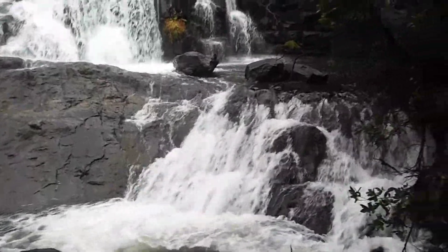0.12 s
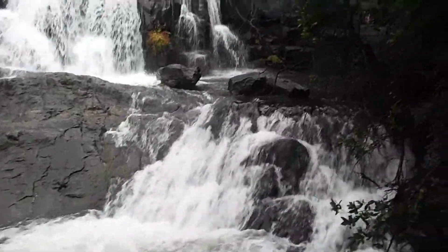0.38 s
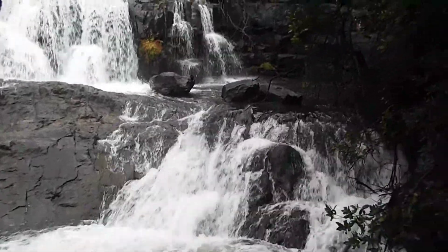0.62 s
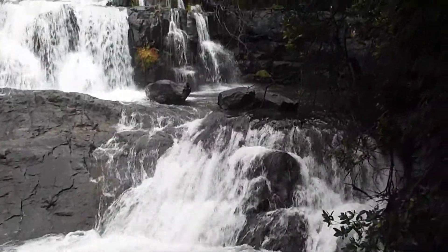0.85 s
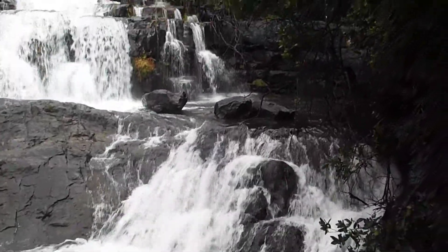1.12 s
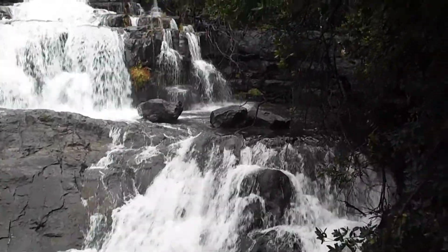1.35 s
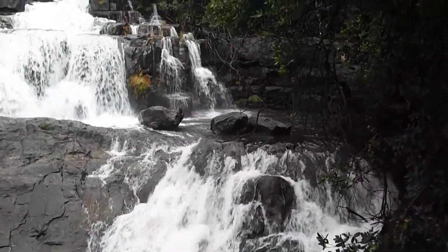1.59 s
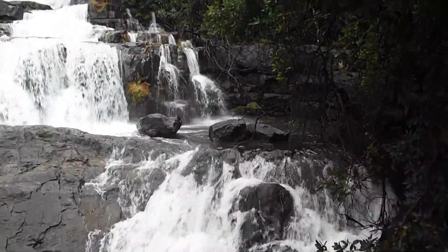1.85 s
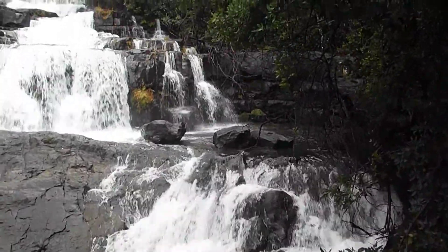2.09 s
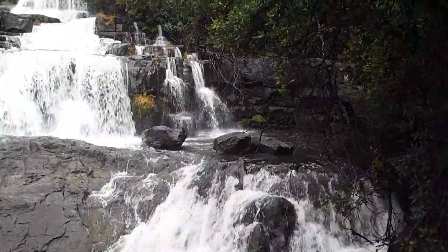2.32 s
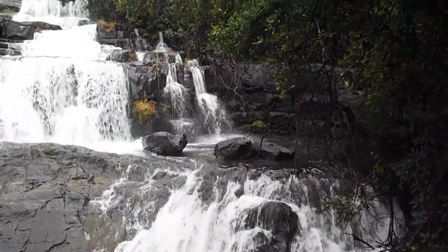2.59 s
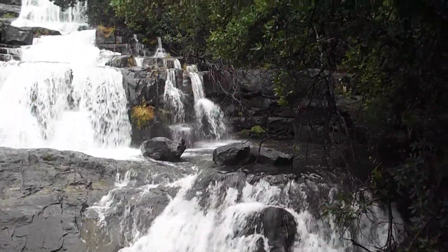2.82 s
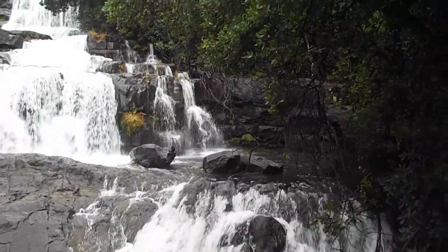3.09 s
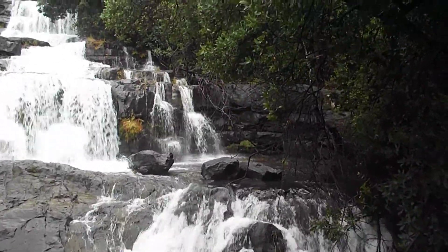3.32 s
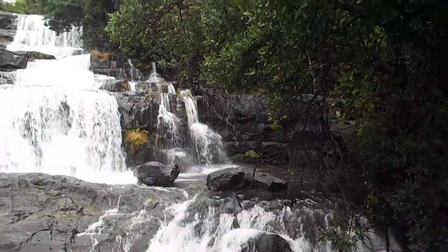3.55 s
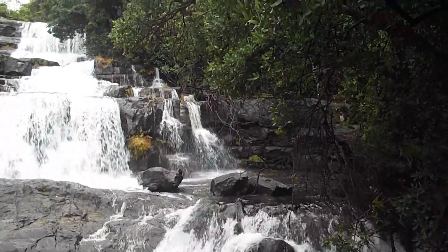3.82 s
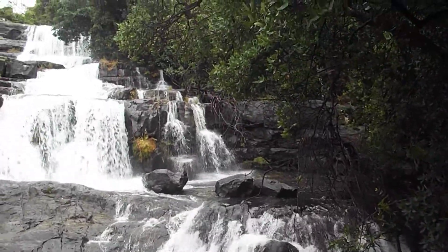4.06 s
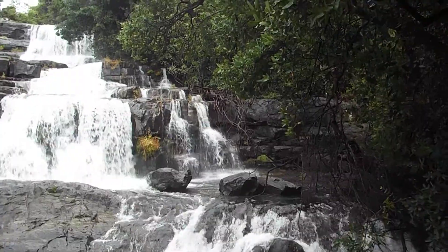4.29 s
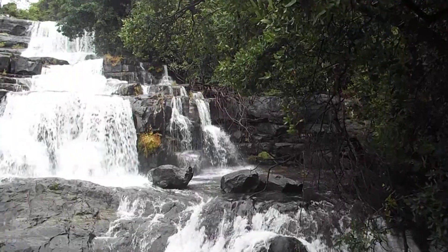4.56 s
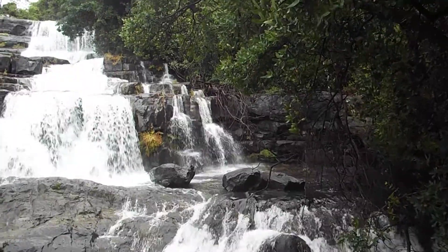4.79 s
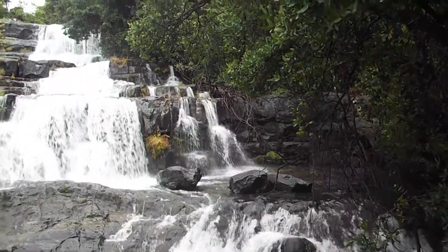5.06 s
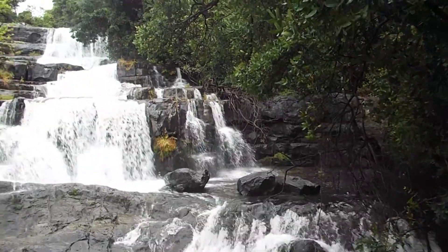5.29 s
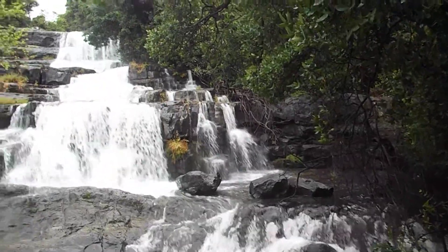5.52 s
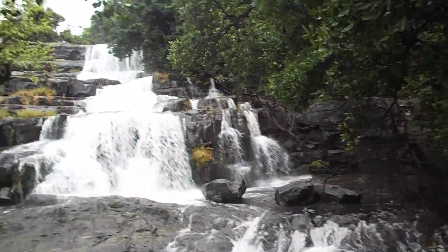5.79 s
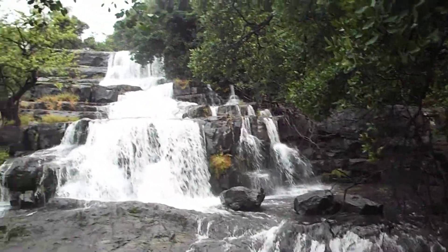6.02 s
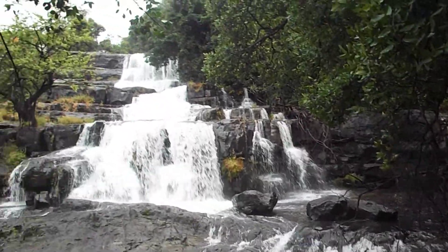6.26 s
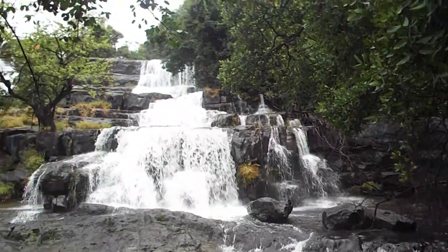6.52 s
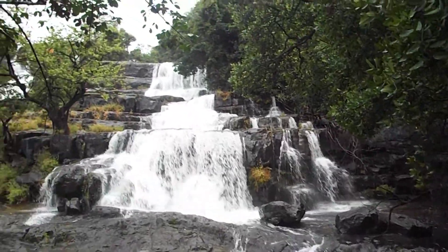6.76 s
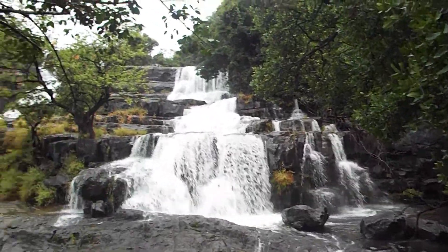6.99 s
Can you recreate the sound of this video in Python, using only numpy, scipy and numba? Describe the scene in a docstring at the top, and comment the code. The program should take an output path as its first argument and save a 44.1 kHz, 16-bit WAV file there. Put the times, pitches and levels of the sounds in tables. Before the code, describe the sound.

Constant loud white-water noise from start to end, without build-up or fade. The falling water is a thick hiss with slight drifting patches and faint tiny bubble sounds underneath. Heard close through a small camera microphone outdoors: bass cut, piercing upper range, dull at the very top, stronger in the left channel. Very brief crests set off sudden level dips that refill within hundredths of a second.

```python
"""In a forest, a waterfall pours over rock steps, close to a small stereo camera microphone.
Dense random noise in drifting patches, with short gliding bubble rings under it, makes one steady rush.
A cavity before the capsules gives it a bright peak; the left channel is louder.
Many times a second the whole level drops at once and climbs back within a few hundredths of a second:
at listed instants, each under a brief crest, and wherever gain control answers a crest of the rush."""
import sys
import numpy as np
from scipy import signal
from scipy.fft import rfft, irfft
from scipy.io import wavfile
from scipy.ndimage import uniform_filter1d, minimum_filter1d
from numba import njit

SR = 44100
rng = np.random.default_rng(int(sys.argv[2]) if len(sys.argv) > 2 else 0)


def natural_amplitude(level_db):
    """Convert a level in decibels to a linear amplitude factor, elementwise."""
    exponent = np.asarray(level_db, float) / 20
    return 10 ** exponent


def to_wav(sig):
    """Store sig (one row per channel, or 1-D mono) as 16-bit WAV at the path in sys.argv[1].

    Samples outside -1..1 are clipped; the rate is SR.
    """
    pcm = np.clip(np.atleast_2d(sig), -1, 1) * 32767
    pcm = np.round(pcm).astype(np.int16)
    wavfile.write(sys.argv[1], SR, pcm.T)  # frames by channels


N = 314433  # samples, about 7.1 s


def evened(x):
    """Scales to rms 1."""
    return x / np.sqrt(np.mean(x ** 2) + 1e-20)


def read(points, hz):
    """Reads a table on a log-frequency axis."""
    f, value = np.transpose(points)
    return np.interp(np.log(hz + 1), np.log(f + 1), value)


def churn(patchy_db):
    """White random spectra with drifting patches where sheets of water thicken and thin."""
    frames = N // 128 + 5
    real, imaginary, patches = rng.standard_normal((frames, 257, 3)).T
    # patches about 700 Hz wide and 60 ms long
    patches = uniform_filter1d(patches, size=8, axis=0)
    patches = evened(uniform_filter1d(patches, size=20, axis=1))
    spectra = (real + 1j * imaginary) * natural_amplitude(patchy_db * patches)
    return evened(signal.istft(spectra, nperseg=512, noverlap=384)[1][:N])


BUBBLES_PER_S = 7000


def bubbles():
    """Short rings that glide up as the bubble nears the surface, equal energy per Hz."""
    size_db = 3.7 * np.minimum(rng.exponential(1, N), 5)
    bursts = natural_amplitude(size_db) * (rng.random(N) < BUBBLES_PER_S / SR)
    pitches = np.geomspace(300, 13000, num=24)  # Hz, at the start of the glide
    kind = rng.integers(0, len(pitches), N)
    out = np.zeros(N)
    for k, hz in enumerate(pitches):
        cycle = np.arange(1500) * hz / SR
        glide = np.sin(2 * np.pi * cycle * (1 + 0.011 * cycle))
        ring = glide * cycle * np.exp(-cycle / 1.23)
        ring = ring / np.linalg.norm(ring) * np.sqrt(hz)
        out += signal.oaconvolve(bursts * (kind == k), ring)[:N]
    return evened(out)


# Colour of the rush at the microphone, before the cavity. Each row: frequency in Hz, relative dB per Hz.
RUSH = [(20, -8.5), (107, -15), (221, -10.5), (450, -10), (620, -3.5), (1000, -6), (1700, -7), (4000, -6),
        (5600, -8), (6800, -7.5), (7600, -10), (9500, -14.5), (12500, -20.5), (14500, -28.5),
        (15150, -27.5), (15300, -40)]
# Likeness of the two ports. Each row: frequency in Hz, share of the left sound in the right, 0 to 1.
LIKENESS = [(40, .72), (130, 0.95), (290, 1), (700, 1), (4000, 0.98), (5000, 0.94), (6400, 0.87),
            (8000, 0.71), (9500, 0.56), (11500, .47), (15000, .4)]
# Balance of the two ports. Each row: frequency in Hz, left over right in dB.
LEFT_OVER_RIGHT = [(40, -2), (130, 4.5), (1000, 5), (2600, 5), (4000, 7), (5000, 7.5), (5800, 5), (7400, 3),
                   (8800, 5), (10200, 4), (12000, 6), (13500, 6)]
# Phase between the two ports. Each row: frequency in Hz, lead of the left in radians.
LEFT_LEAD = [(0, 0), (5770, -0.082), (9300, 0.2), (15300, -0.1)]
BUBBLES_DB = -11.5  # bubbles relative to the churn
PORT_HZ, PORT_WIDTH_HZ, PORT_DB = 5530, 2270, 10  # resonance of the cavity before the capsules
FLOW_DB = -15  # steady rms level of the fall, mean of both channels


def waterfall():
    """Churn and bubbles reach both ports; a diffuse part differs between them."""
    hz = np.fft.rfftfreq(N, 1 / SR)
    near = rfft(evened(churn(patchy_db=0.38) + natural_amplitude(BUBBLES_DB) * bubbles()))
    diffuse = rfft(churn(patchy_db=1.0))
    same = np.clip(read(LIKENESS, hz), 0, 1)
    right = same * near + np.sqrt(1 - same ** 2) * diffuse
    right = right * np.exp(-1j * read(LEFT_LEAD, hz))
    ports = np.array([near, right * natural_amplitude(-read(LEFT_OVER_RIGHT, hz))])
    cavity_db = PORT_DB / (1 + (2 * (hz - PORT_HZ) / PORT_WIDTH_HZ) ** 2)
    sound = irfft(ports * natural_amplitude(read(RUSH, hz) + cavity_db), N)
    return sound / np.std(sound.mean(0)) * natural_amplitude(FLOW_DB)


# The clearest sudden drops of level. Each row: start in seconds, depth in dB.
DROPS = [(0.0925, 3), (0.2495, 5.5), (0.3117, 7), (0.4425, 4.5), (0.4738, 5), (0.6556, 3.5), (0.8395, 4.5),
         (0.948, 3.5), (1.3592, 4), (1.734, 7.1), (2.0141, 4.3), (2.1996, 6.3), (2.6226, 7), (2.9594, 5),
         (2.9909, 4.5), (3.0432, 4.5), (3.1818, 8), (3.5053, 6.2), (3.5438, 5), (3.5665, 8), (3.6058, 5),
         (3.7544, 6.5), (3.8056, 4), (3.8493, 5.5), (3.9339, 4.5), (4.2, 5), (4.2946, 7.5), (4.4999, 5.5),
         (4.9833, 6.5), (5.0191, 7.5), (5.0843, 5), (5.3179, 4.5), (5.4249, 4.5), (5.738, 7.5),
         (5.8391, 6.5), (6.0069, 6.5), (6.1964, 6), (6.4937, 6), (6.6007, 7.5), (6.6354, 5.5), (6.6766, 5),
         (6.8435, 7.5), (6.8935, 3.5), (6.9618, 6), (7.0968, 1)]
CREST_DB, CREST_S = 3.5, 0.0004  # height of a crest, and time from its top to 1/e of that in dB


def crests_db():
    """A brief swell of the rush, bell-shaped in dB, centred where each clear drop begins."""
    marks = np.zeros(N)
    marks[np.round(np.transpose(DROPS)[0] * SR).astype(int)] = CREST_DB
    t = np.arange(-100, 101) / SR
    return signal.oaconvolve(marks, np.exp(-(t / CREST_S) ** 2), "same")


@njit
def ducking(crest_db, drops_db, trip_db, duck_db, slope, hold, climb):
    """Loss over time: set by a listed drop or by a crest that trips, held, then climbing back."""
    loss_db, now, wait = np.zeros(len(crest_db)), 0., 0.
    for i in range(len(crest_db)):
        over = crest_db[i] - trip_db
        want = max(drops_db[i], duck_db + slope * over if over > 0 else 0.)
        if want > now:
            now, wait = want, hold
        elif wait > 0:
            wait -= 1
        else:
            now = max(now - climb, 0.)
        loss_db[i] = now
    return loss_db


FALL_S, HOLD_S, RECOVER_DB_PER_S = 0.00017, 0.0063, 274.5  # quick drop, short hold, steady climb back
# a crest over the trip level ducks the gain, slightly less for a higher crest
TRIP_DB, DUCK_DB, DUCK_DB_PER_DB = -3, 2, -0.18


def dips_db(sound):
    """The clear drops, and shallower ones where gain control answers the crests of the rush."""
    drops_db = np.zeros(N)
    start_s, depth_db = np.transpose(DROPS)
    drops_db[np.round(start_s * SR).astype(int)] = depth_db
    crest_db = 20 * np.log10(abs(sound).max(0) + 1e-9)
    hold, climb = HOLD_S * SR, RECOVER_DB_PER_S / SR  # samples, dB per sample
    loss_db = ducking(crest_db, drops_db, TRIP_DB, DUCK_DB, DUCK_DB_PER_DB, hold, climb)
    keep = np.exp(-1 / (FALL_S * SR))
    return -signal.lfilter([0, 1 - keep], [1, -keep], loss_db)  # rounds off the steps


def scene():
    """The fall fills the whole scene, with a brief crest at each clear drop."""
    return waterfall() * natural_amplitude(crests_db())


def low_pass(x):
    """Removes everything above the highest recorded frequency."""
    return signal.sosfilt(signal.butter(12, 15720, fs=SR, output="sos"), x)


LOW_CUT_HZ = 250
LIMIT = 0.97  # highest sample value the limiter lets through


def record(dry):
    """The level dips, a low cut removes rumble, and a fast limiter holds rare crests."""
    low_cut = signal.butter(2, LOW_CUT_HZ, "high", fs=SR)
    dipped = signal.lfilter(*low_cut, dry * natural_amplitude(dips_db(dry)))
    room_left = np.minimum(1, LIMIT / (abs(dipped).max(0) + 1e-9))
    limiter_gain = uniform_filter1d(minimum_filter1d(room_left, size=41), size=41)
    return low_pass(dipped * limiter_gain)


dry = scene()
out = record(dry)
to_wav(out)
```